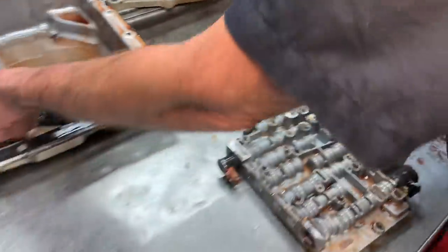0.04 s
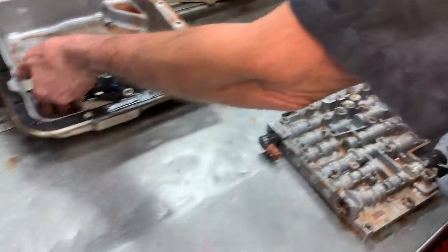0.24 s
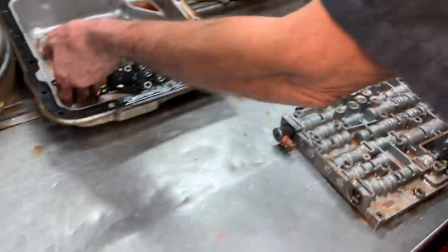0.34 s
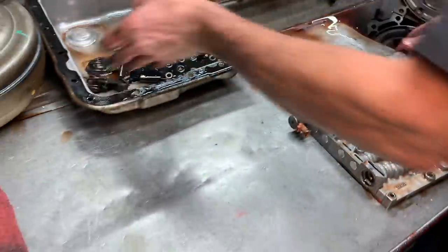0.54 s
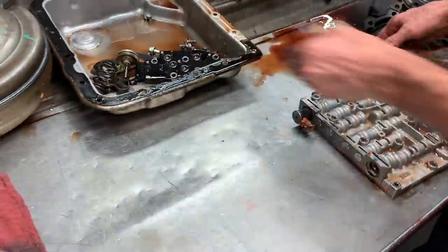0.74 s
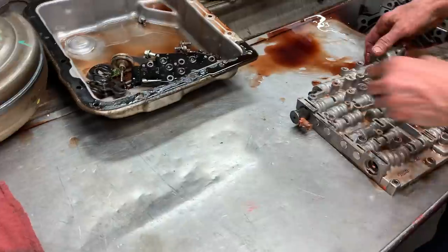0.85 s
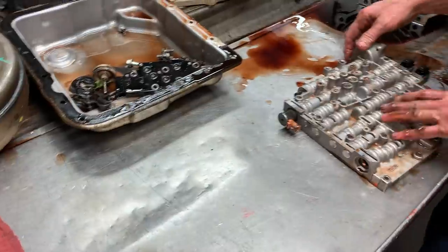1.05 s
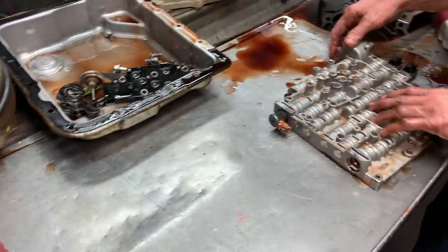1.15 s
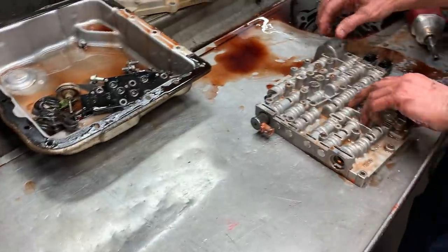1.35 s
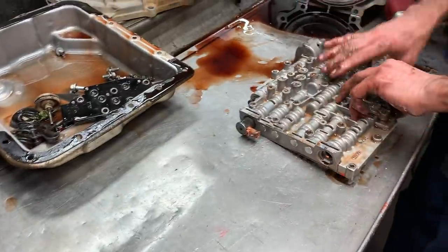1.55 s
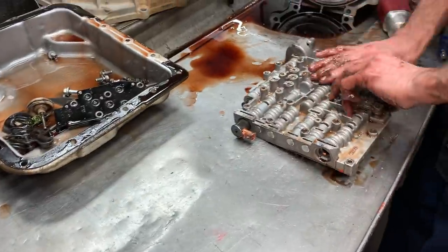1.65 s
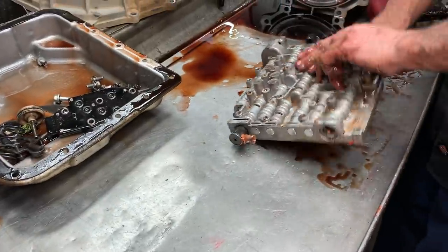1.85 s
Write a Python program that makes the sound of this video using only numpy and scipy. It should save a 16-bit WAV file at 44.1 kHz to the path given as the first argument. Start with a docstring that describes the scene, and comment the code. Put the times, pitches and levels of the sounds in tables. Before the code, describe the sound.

Metal parts clatter sharply into a steel pan, then a heavy metal block bumps and scrapes

```python
"""Throughout: low workshop hum and air as shaped noise, its treble drifting; the bench rumbles under the hands.
From the start: faint clinks. A hand drops and stirs small metal parts in a steel pan on a workbench: knocks as
dying modes plus noise cracks, bright clinks as paired sines, dull thuds, a rattle that dies away.
From 1.5 s: a heavy cast block is set down, bumped and dragged: bench and casting modes with gritty noise."""
import sys
import numpy as np
from scipy import signal
from scipy.fft import rfft, irfft
from scipy.io import wavfile
from scipy.ndimage import uniform_filter1d

SR = 44100
rng = np.random.default_rng(int(sys.argv[2]) if len(sys.argv) > 2 else 0)


def waveform_to_disk(signal):
    """Save audio, clipped to [-1, 1], as 16-bit WAV at the path in sys.argv[1]."""
    frames = np.transpose(np.atleast_2d(signal))
    scaled = np.clip(frames, -1, 1) * 32767
    samples = np.round(scaled).astype(np.int16)
    wavfile.write(sys.argv[1], SR, samples)


N = 83790

# parts striking the pan:
# t/s, level/dB, f/Hz, then re level: boom/dB, ring/dB, crack/dB; crack t60/s
KNOCKS = [(0.22, -20, 877, -15, 0.5, -9.5, 0.081), (0.23, -26, 960, -19, 4.5, -31, 0.06),
          (0.24, -29, 865, -10, -28, -19, 0.071), (0.361, -14, 1003, -13, -9, -13.5, 0.052),
          (0.37, -28.5, 1016, 4.5, 0.5, -12.5, 0.02), (0.436, -18.5, 1225, 2, 0, -13.5, 0.079),
          (0.443, -25, 1657, -3.5, 2.5, -12.5, 0.13), (0.512, -11, 1102, -22.5, -10, -11, 0.085),
          (0.529, -23.5, 1160, -43, -2.5, -14, 0.038), (0.54, -23, 1303, -18.5, -19, -5, 0.034),
          (0.558, -25.5, 1134, -36, -18.5, -15, 0.065), (0.568, -12, 1069, -27.5, -12.5, -17, 0.07),
          (0.587, -12, 1125, -25.5, -13.5, -16, 0.071), (0.595, -8, 1111, -39.5, -10, -10, 0.046),
          (0.613, -22.5, 1130, -45, -2.5, -14.5, 0.18), (0.623, -30, 1220, -20.5, -14.5, -6, 0.076),
          (0.632, -20, 1100, -18, -3, -16, 0.08), (0.651, -9.5, 1058, -21, -6.5, -16.5, 0.09),
          (0.665, -39.5, 1010, 3, -8, -13, 0.036), (0.679, -42, 1120, 3, -19.5, -11.5, 0.077),
          (0.704, -37, 1250, -26, -11, -8.5, 0.066), (0.711, -27, 1250, -39, -1.5, -9.5, 0.032),
          (0.72, -30, 1480, -15.5, -24.5, -37, 0.06), (0.739, -33, 1420, -21, -19, -22, 0.055),
          (0.744, -41, 1260, -15, -6, -9.5, 0.096), (0.757, -36, 1080, -16, -9, -23, 0.065),
          (0.771, -40, 1530, -18, -16, -17, 0.06), (0.784, -42, 1420, -32, -13, -26, 0.078),
          (0.8, -41, 1390, -27.5, -9, -16.5, 0.06), (0.819, -44, 1130, -25, -14, -15, 0.03),
          (0.829, -40, 1443, -39, -12, -11, 0.032), (0.841, -38.5, 1490, -17, -19, -7, 0.077),
          (0.859, -47, 1723, -8, -19, -8, 0.038), (0.964, -44, 993, -25.5, -3, -26, 0.079),
          (1.036, -46.5, 974, -19, -9.5, -25, 0.04), (1.435, -54, 1030, -14.5, -8, -9, 0.036),
          (1.473, -55, 991, -19, -6, -24, 0.034)]
# low pan modes: f/Hz, level/dB, t60/s
BOOM_MODES = [(230, -6, .06), (270, 0, .08), (300, -2, .08), (410, -5, .06), (441, -4, .12), (610, -9, .09)]
# higher pan modes: f/Hz, level/dB, t60/s
RING_MODES = [(767, -5, 0.048), (909, 7, 0.062), (1035, -7, 0.18), (1160, 0, 0.072), (1341, 11.5, 0.046),
              (1480, -6.5, 0.037), (1606, 4, 0.064), (1768, 3.5, 0.052), (1773, -2.5, 0.043),
              (2075, -7.5, 0.095), (2308, -4, 0.065), (2905, -23.5, 0.027)]
# impact noise spectrum: f/Hz, level/dB
CRACK_SPECTRUM = [(1060, -21), (1800, -1), (2220, -5), (4620, -3.5), (8060, -9), (9680, -9.5),
                  (12700, -20.5), (16000, -31)]
# loose part chattering in the pan: t/s, level/dB
RATTLE_LEVEL = [(.22, -51), (.3, -65), (.355, -44.5), (.38, -47), (.43, -45.5), (.47, -41), (.505, -59.5),
                (.53, -45.5), (.563, -50.5), (.6, -40.5), (.65, -37.5), (.7, -45.5), (.76, -51), (.82, -59),
                (.866, -57), (.88, -76), (1.05, -63.5)]
# small parts meeting each other: t/s, level/dB, f/Hz, t60/s before the cap
CLINKS = [(0.001, -70, 10700, 0.27), (.019, -57, 8360, 0.022), (0.027, -61.5, 7530, 0.059),
          (0.03, -56.5, 4420, 0.03), (.047, -62.5, 1930, 0.093), (0.09, -62.5, 1690, 0.17),
          (.192, -60, 4330, .03), (0.199, -53, 4700, 0.061), (0.317, -47.5, 7660, 0.037),
          (0.329, -54, 4230, 0.054), (.347, -38.5, 7400, 0.23), (.362, -34.5, 4980, 0.041),
          (0.372, -32.5, 5260, 0.036), (0.389, -33.5, 6300, 0.018), (0.403, -32.5, 6420, 0.034),
          (0.433, -25, 10660, 0.012), (.445, -26, 6730, 0.021), (0.47, -37.5, 9800, 0.077),
          (0.47, -43, 11200, 0.063), (0.481, -39, 4210, 0.034), (0.516, -23, 4750, 0.027),
          (.598, -30, 10850, 0.033), (.600, -37, 6120, .05), (0.666, -40, 3900, 0.18),
          (.692, -38, 7500, 0.044), (.695, -45.5, 8340, .08), (0.746, -50, 4960, 0.048),
          (0.839, -44, 4040, 0.022), (.840, -35.5, 6150, 0.014), (0.853, -68, 9790, 0.072),
          (.483, -38.5, 12660, 0.054), (0.417, -34, 11000, 0.022), (0.445, -36, 11600, 0.014),
          (.490, -39, 6140, 0.053), (0.484, -41, 5350, .04), (.491, -37, 4060, 0.019),
          (0.472, -37.5, 7700, 0.035), (0.46, -38.5, 4230, 0.014)]
# heap of small parts shifting: t/s, level/dB
JINGLE_LEVEL = [(.185, -90), (.195, -61), (.215, -83), (.3, -64), (.345, -54.5), (.39, -50), (.43, -49),
                (.47, -53), (.505, -54), (.55, -51), (.62, -56), (.68, -49.5), (.72, -47), (.75, -79),
                (.82, -70), (.865, -61), (.88, -80), (.95, -84)]
# block landing and bumping on the bench: t/s, level/dB, edge re level/dB, edge f/Hz
THUMPS = [(1.547, -22, -6.5, 600), (1.5532, -26, 0, 870), (1.561, -23, -8, 800), (1.581, -32.5, -4, 815),
          (1.711, -38, 1.5, 1120), (1.746, -42, -14, 702), (1.8, -38, -13, 504), (1.814, -42, -2.5, 1150),
          (1.853, -34.5, -4, 800), (1.881, -32, -8.5, 1525)]
# bench top modes: f/Hz, level/dB, t60/s
BENCH_MODES = [(105, -20, .1), (190, -16, .08), (266, 0, .09), (430, -17, .1)]
# casting modes: f/Hz, level/dB, t60/s
BLOCK_MODES = [(439, 0.5, 0.04), (600, -8.5, 0.067), (800, -2.5, 0.045), (870, 0, 0.03), (1150, -8, 0.025),
               (1540, -9.5, .03), (2220, -25, 0.026)]
# rough contact noise spectrum: f/Hz, level/dB
GRIT_SPECTRUM = [(200, -18), (500, 1.5), (1200, 2), (2300, -13), (3000, -20.5), (5000, -29), (8000, -33.5),
                 (16000, -68)]
# block sliding: t/s, level/dB, edge re level/dB
DRAG_LEVEL = [(1.585, -70.5, -8), (1.61, -44.5, -13), (1.635, -48, -15), (1.655, -60.5, -14.5),
              (1.7, -69, -9), (1.72, -48, -11.5), (1.77, -42.5, -12), (1.795, -55, -1.5), (1.82, -50, -1.5),
              (1.85, -47, -1.5), (1.9, -42.5, -2.5)]
# dull thuds through the bench: t/s, level/dB, f/Hz, t60/s
THUDS = [(.080, -54, 223, .1), (.361, -34, 130, .08), (.436, -36.5, 142, .08), (.510, -43.5, 50, .1),
         (.592, -43.5, 56, .12), (.650, -35, 140, .12), (.700, -42.5, 113, .15)]
# room decay: f/Hz, t60/s
ROOM_T60 = [(200, 0.99), (1000, .55), (4000, 0.69), (12000, 0.48)]
# workshop noise spectrum: f/Hz, level/dB
SHOP_SPECTRUM = [(15, -44), (25, -42), (92, -1), (161, -17.5), (229, -12), (384, -18), (840, -21.5),
                 (1100, -19), (1330, -24), (10100, -32), (16000, -40)]
# background treble gain: t/s, treble level/dB, further level at the top/dB
TREBLE_GAIN = [(0, -5, 1), (.18, -6.5, -10), (.9, -2, 2), (1.2, 0, 5.5), (1.52, -1, 5.5), (1.66, -6, -10),
               (1.9, -5, -9)]
# bench rumbling under the hands: t/s, level/dB
RUMBLE_LEVEL = [(0, -65.5), (.33, -50), (.45, -48.5), (.6, -47.5), (.75, -55.5), (.9, -62.5), (1.1, -62),
                (1.4, -67), (1.5, -67), (1.56, -52), (1.62, -57.5), (1.75, -64), (1.9, -61)]
# rumble noise spectrum: f/Hz, level/dB
RUMBLE_SPECTRUM = [(15, -15), (40, -15.5), (90, -0.5), (150, -5.5), (250, -46.5)]

BLOW_N = 12000  # samples per blow
RISE_S, SOFT_RISE_S = 0.0005, 0.0015
KNOCK_RISE_S, KNOCK_T60_S = 0.0018, 0.015
UPPER_RATIO, UPPER_DB = 1.42, -9.5
RATTLE_PER_S, RATTLE_SPREAD_DB = 200, 3.2
CLINK_TICK_DB, CLINK_TICK_T60_S = -5, 0.016
CLINK_FLUTTER_DB, CLINK_MAX_T60_S = 4.5, 0.2
PAIR_RATIO, PAIR_DB = 1.013, -4.5
JINGLE_PER_S, JINGLE_SPREAD_DB, JINGLE_T60_S = 4000, 3, 0.011
JINGLE_LOW_HZ, JINGLE_HIGH_HZ, JINGLE_TILT_DB_PER_OCT = 2000, 15800, -2
EDGE_T60_S = 0.037
GRIT_DB, GRIT_T60_S = -8.5, 0.08
DRAG_PER_S, DRAG_SPREAD_DB, DRAG_GRIT_T60_S = 400, 2, 0.037
ROOM_DB, ROOM_FROM_HZ = -15.5, 650
SHOP_DB, TREBLE_FROM_HZ, TOP_FROM_HZ = -63, 2015, 7300
BAND_LIMIT_HZ = 16200


def pan():
    """Each blow wakes the pan's hollow tock, boom and ring plus a noise crack; a loose part chatters between."""
    out, t = np.zeros(N), np.arange(BLOW_N) / SR
    for s, db, hz, boom_db, ring_db, crack_db, t60 in KNOCKS:
        boom = amp(boom_db) * peaked(ring(BOOM_MODES, 0.00089, 1.2))
        ringing = amp(ring_db) * peaked(ring(RING_MODES))
        crack = coloured([(1000, -28)] + CRACK_SPECTRUM, BLOW_N)
        crack = crack * amp(crack_db - 60 * t / t60) * np.minimum(t / 0.0012, 1)
        # 1 ms early: the rise takes time
        add(out, s - 0.001, amp(db) * (tock(hz) + boom + ringing + crack))
    tocks = [tock(hz)[:2000] for hz in np.linspace(950, 1500, num=12)]
    return out + amp(curve(RATTLE_LEVEL)) * grains(RATTLE_PER_S, RATTLE_SPREAD_DB, tocks)


def tock(hz):
    """A few cycles of the hollow pan: two short modes, peak 1."""
    modes = [(hz, 0, KNOCK_T60_S), (UPPER_RATIO * hz, UPPER_DB, KNOCK_T60_S)]
    return peaked(ring(modes, KNOCK_RISE_S, 0.92))


def parts():
    """Clinks ring as close pairs of modes after a noise tick, over a dense jingle of short high rings."""
    return clinks() + jingle()


def clinks():
    """Paired sines beat; neighbours touching the ringing part make its level flutter."""
    out, t = np.zeros(N), np.arange(BLOW_N) / SR
    for s, db, hz, t60 in CLINKS:
        t60 = min(t60, CLINK_MAX_T60_S)
        wander = evened(uniform_filter1d(rng.standard_normal(BLOW_N), size=90))
        flutter = amp(CLINK_FLUTTER_DB * wander)
        pair = ring([(hz, 0, t60), (PAIR_RATIO * hz, PAIR_DB, t60 / 2)], RISE_S, 0)
        tick = coloured([(2000, -37)] + CRACK_SPECTRUM[1:], BLOW_N)
        tick = tick * amp(CLINK_TICK_DB - 60 * t / CLINK_TICK_T60_S)
        add(out, s, amp(db) * (flutter * pair + tick))
    return out


def jingle():
    """Many small collisions, each waking three randomly chosen high modes, weaker with pitch."""
    pitches = np.geomspace(JINGLE_LOW_HZ, JINGLE_HIGH_HZ, num=90)
    shapes = []
    for _ in range(70):
        modes = [(hz, JINGLE_TILT_DB_PER_OCT * np.log2(hz / 5000), JINGLE_T60_S)
                 for hz in rng.choice(pitches, size=3)]
        shapes.append(ring(modes, 0.00018)[:1000])
    return amp(curve(JINGLE_LEVEL)) * grains(JINGLE_PER_S, JINGLE_SPREAD_DB, shapes)


def block():
    """Thumps ring bench and casting with a gritty puff; sliding is a stream of tiny thumps and grit."""
    return thumps() + drag()


def soft_rise():
    """Gradual onset of the block's rough contact."""
    t = np.arange(BLOW_N) / SR
    return (1 - np.exp(-t / SOFT_RISE_S)) ** 2


def thumps():
    """Low bench modes, in phase, plus an edge of casting modes and decaying grit."""
    out, t = np.zeros(N), np.arange(BLOW_N) / SR
    for s, db, edge_db, hz in THUMPS:
        casting = peaked(ring(BLOCK_MODES + [(hz, 5, EDGE_T60_S)], SOFT_RISE_S))
        grit = soft_rise() * amp(GRIT_DB - 60 * t / GRIT_T60_S) * coloured(GRIT_SPECTRUM, BLOW_N)
        bench = peaked(ring(BENCH_MODES, 0.0022, 1.3, scatter=0))
        add(out, s - 0.001, amp(db) * (bench + amp(edge_db) * (casting + grit)))
    return out


def drag():
    """Stick and slip as random blows on bench (low) and casting with grit (high)."""
    t = np.arange(BLOW_N) / SR
    bench_shapes = [ring(BENCH_MODES, 0.0012, 0.5) for _ in range(4)]
    edge_shapes = []
    for _ in range(8):
        grit = soft_rise() * amp(-60 * t / DRAG_GRIT_T60_S) * coloured(GRIT_SPECTRUM, BLOW_N)
        edge_shapes.append(0.66 * ring(BLOCK_MODES, SOFT_RISE_S) + grit)
    low = grains(DRAG_PER_S, DRAG_SPREAD_DB, bench_shapes)
    high = grains(DRAG_PER_S, DRAG_SPREAD_DB, edge_shapes)
    return amp(curve(DRAG_LEVEL)) * (low + amp(curve(DRAG_LEVEL, col=2)) * high)


def thuds():
    """The bench gives: one dying low sine per thud."""
    out = np.zeros(N)
    for s, db, hz, t60 in THUDS:
        add(out, s, amp(db) * peaked(ring([(hz, 0, t60)], 0.0013, 0)))
    return out


def room(x):
    """Reverberation: high-passed input through a unit-energy noise tail, each band dying at its own speed."""
    noise = rng.standard_normal(SR) * (np.arange(SR) > 300)  # 7 ms gap first
    hz, t, bands = signal.stft(noise, SR, nperseg=256)
    decay = amp(-60 * t / read(ROOM_T60, hz)[:, None])
    tail = signal.istft(bands * decay, SR, nperseg=256)[1]
    high_pass = signal.butter(2, ROOM_FROM_HZ, "high", fs=SR, output="sos")
    x = signal.sosfilt(high_pass, x)
    return signal.fftconvolve(x, tail / np.linalg.norm(tail))[:N]


def shop():
    """Steady air and machine noise with drifting treble, plus low noise as the bench rumbles."""
    air = coloured(SHOP_SPECTRUM, N)
    air = shelf(air, TREBLE_FROM_HZ, curve(TREBLE_GAIN))
    air = shelf(air, TOP_FROM_HZ, curve(TREBLE_GAIN, col=2))
    rumble = coloured(RUMBLE_SPECTRUM, N)
    return amp(SHOP_DB) * air + amp(curve(RUMBLE_LEVEL)) * rumble


def shelf(x, hz, db):
    """Scales what lies above hz by a moving gain."""
    low = signal.sosfiltfilt(signal.butter(2, hz, fs=SR, output="sos"), x)
    return x + (amp(db) - 1) * (x - low)


def ring(modes, rise_s=RISE_S, uneven_db=5.0, scatter=1):
    """Dying sines; each blow lands elsewhere and wakes the modes unevenly; scatter in cycles of phase."""
    t = np.arange(BLOW_N) / SR
    hz, db, t60 = np.transpose(modes)[:, :, None]
    db = db + uneven_db * rng.standard_normal(hz.shape)
    cycles = hz * t + scatter * rng.random(hz.shape)
    sines = amp(db - 60 * t / t60) * np.sin(2 * np.pi * cycles)
    return (1 - np.exp(-t / rise_s)) ** 2 * sines.sum(0)


def grains(per_s, spread_db, shapes):
    """Sparse random blows, a few large, each sounding one of the shapes; rms 1."""
    size = amp(spread_db * np.minimum(rng.exponential(1, N), 4))
    blows = size * (rng.random(N) < per_s / SR)
    which = rng.integers(0, len(shapes), N)
    out = np.zeros(N)
    for k, shape in enumerate(shapes):
        out += signal.oaconvolve(blows * (which == k), shape)[:N]
    return evened(out)


def coloured(points, size):
    """Noise of rms 1 with the given spectrum."""
    hz = np.fft.rfftfreq(size, 1 / SR)
    spectrum = rfft(rng.standard_normal(size)) * amp(read(points, hz))
    return evened(irfft(spectrum, size))


def amp(db):
    """dB to amplitude factor."""
    return 10 ** (np.asarray(db) / 20)


def evened(x):
    """Scales to rms 1."""
    return x / np.sqrt(np.mean(x ** 2) + 1e-20)


def peaked(x):
    """Scales to peak 1."""
    return x / abs(x).max()


def read(points, hz):
    """Table value at hz, interpolated over log frequency."""
    f, value = np.transpose(points)
    return np.interp(np.log(hz + 1), np.log(f + 1), value)


def curve(rows, col=1):
    """Table column in dB at every sample; -120 dB outside the table."""
    rows = np.array(rows)
    return np.interp(np.arange(N) / SR, rows[:, 0], rows[:, col], left=-120, right=-120)


def add(mix, s, sound):
    """Adds sound to mix from s seconds, cut at the end."""
    part = mix[round(s * SR):][:len(sound)]
    part += sound[:len(part)]


def scene():
    """Pan, parts and block with their reverberation, over thuds and workshop."""
    near = pan() + parts() + block()
    return (near + amp(ROOM_DB) * room(near) + thuds() + shop())[None]


def record(dry):
    """Band limit: linear-phase low-pass."""
    low_pass = signal.firwin(255, BAND_LIMIT_HZ, window=("kaiser", 9), fs=SR)
    return signal.oaconvolve(dry, low_pass[None], "same")


dry = scene()
out = record(dry)
waveform_to_disk(out)
```